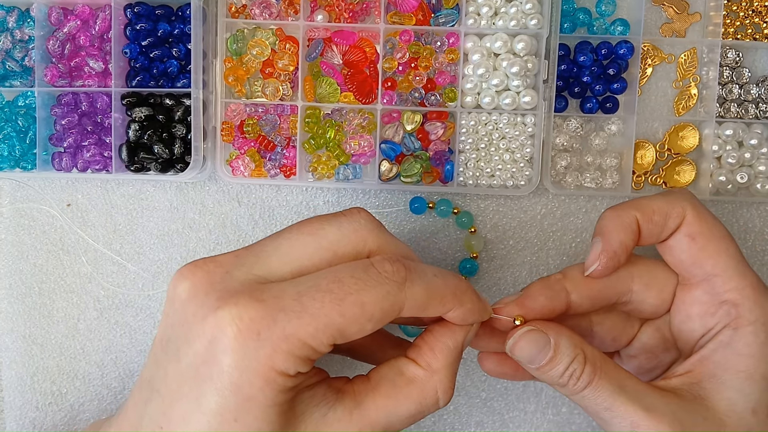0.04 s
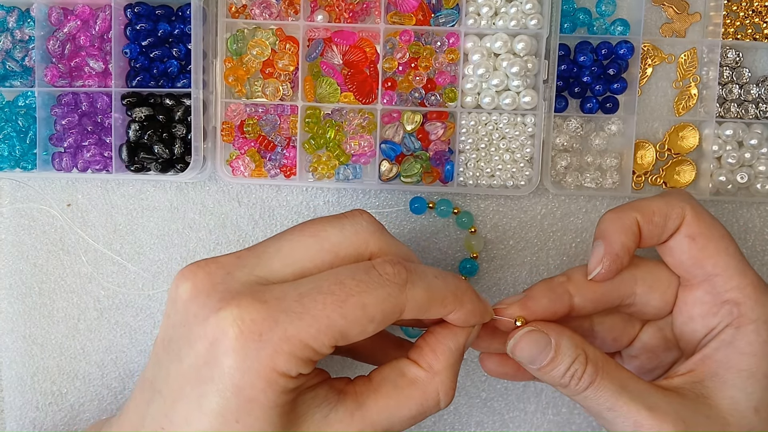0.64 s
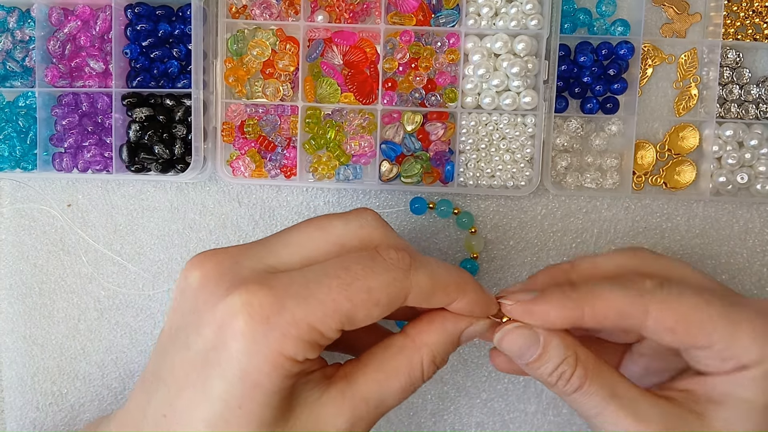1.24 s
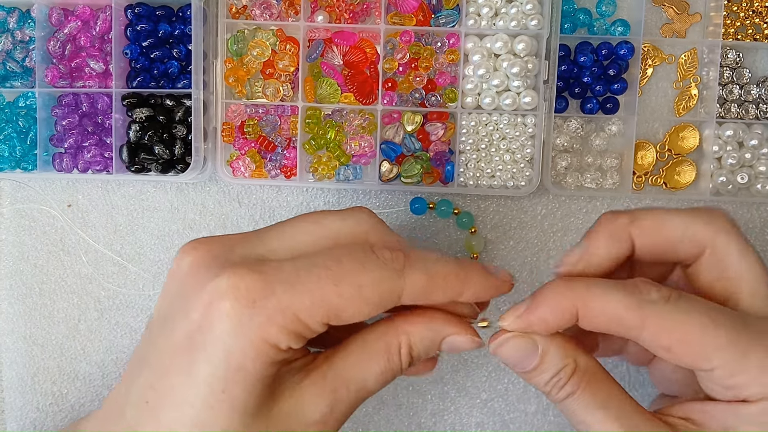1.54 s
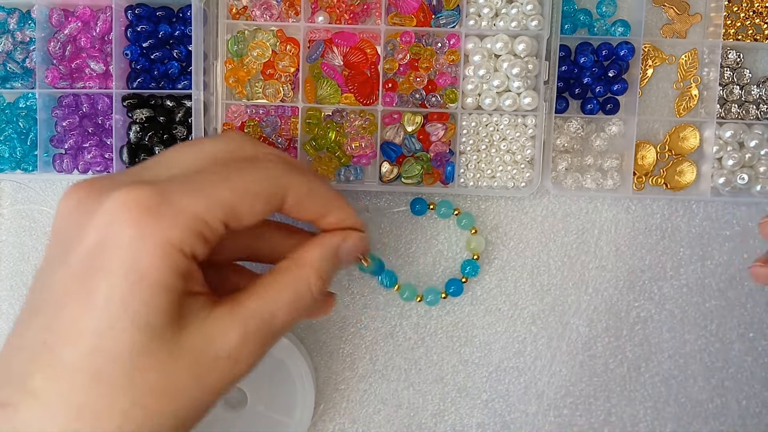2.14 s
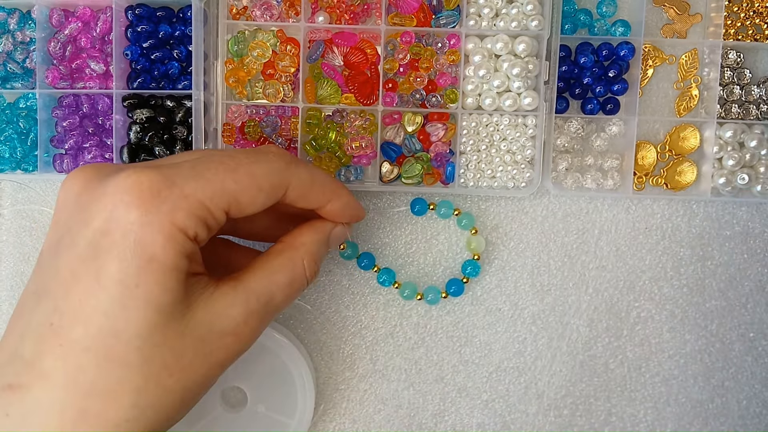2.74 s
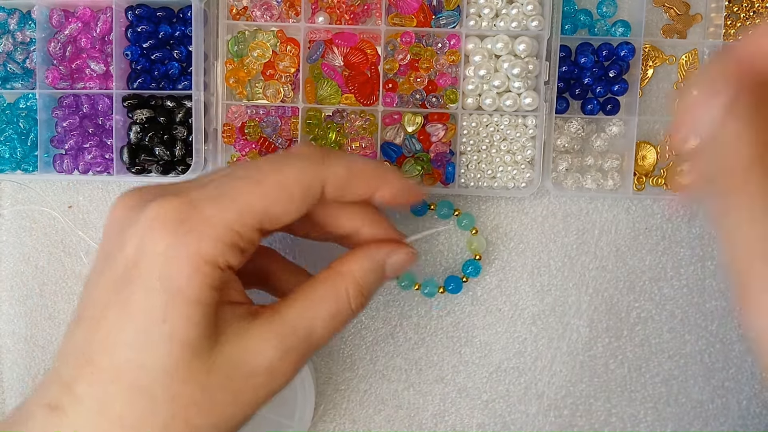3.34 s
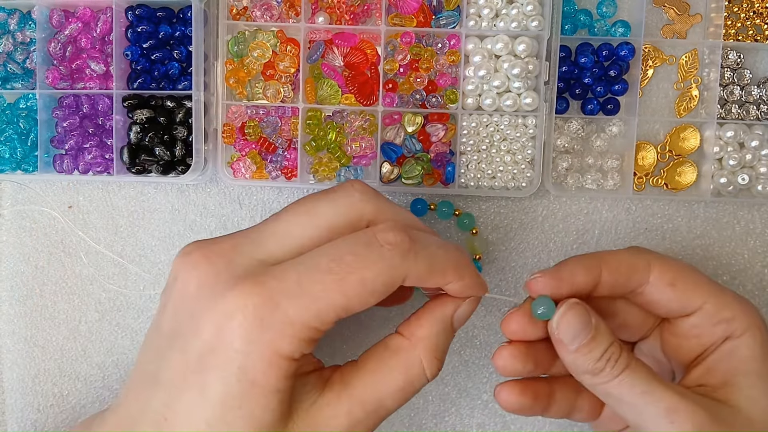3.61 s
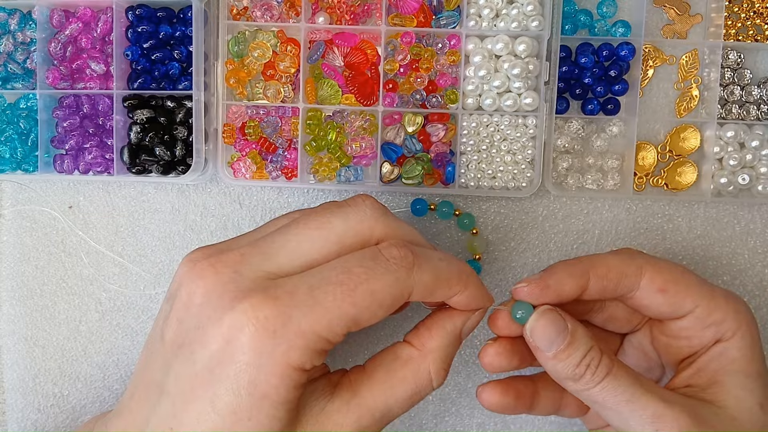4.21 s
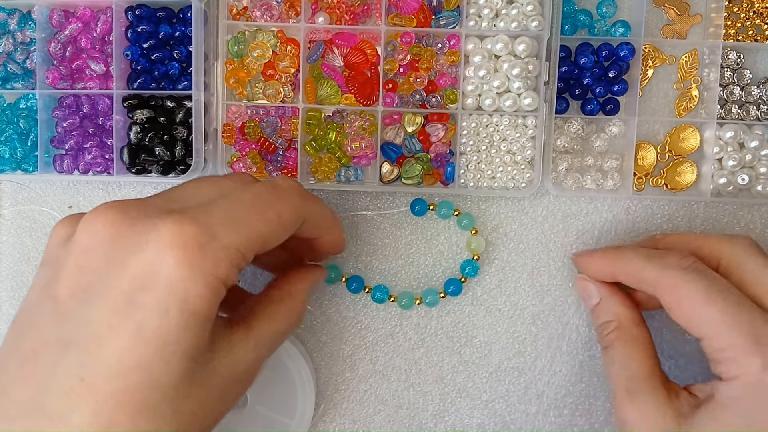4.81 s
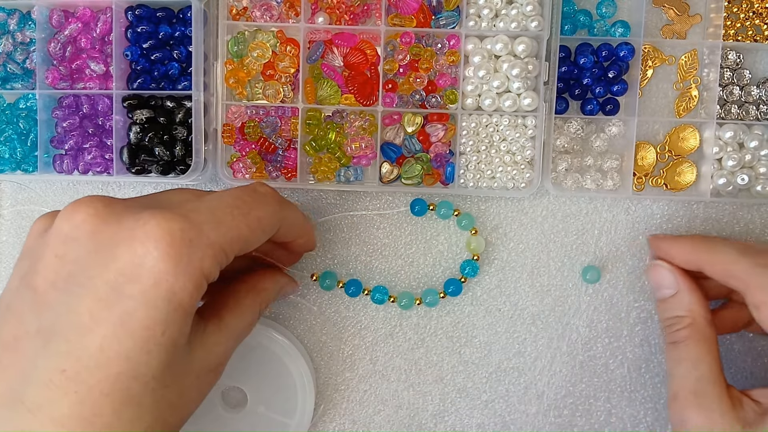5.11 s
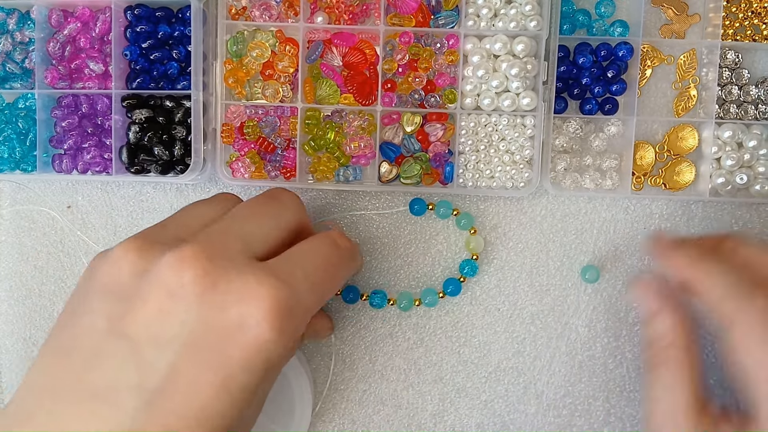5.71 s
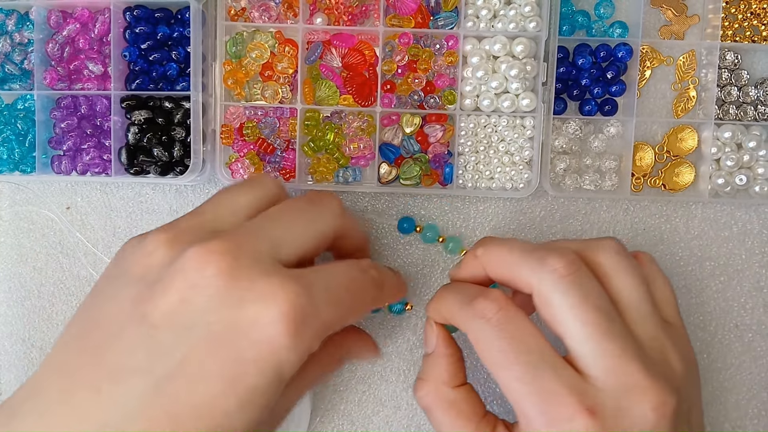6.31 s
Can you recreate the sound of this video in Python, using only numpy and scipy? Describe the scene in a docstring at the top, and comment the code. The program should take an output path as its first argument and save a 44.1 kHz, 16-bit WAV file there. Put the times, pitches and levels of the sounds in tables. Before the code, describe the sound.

In a quiet room, a low engine drone and tyre rush come from outside, swelling and then sinking in pitch as they fade. Nearby, glass beads slide faintly on elastic cord and clatter briefly against the strand with a short ring. Then come small fingernail ticks, grainy brushing on a mat, a couple more bead clicks and dull knocks of hands on the table, all heard close up.

```python
"""A motor vehicle drones through the wall of a quiet room, drops its revs and fades away.
Close by, glass beads are threaded onto elastic cord over a padded table: they rasp along the cord
and click against the strand, each click a sharp snap with a short glassy ring. Fingernails tick,
fingers brush the mat in grainy swells, and hands bump the table, setting its low modes swinging.
The drone is a firing tone with crank overtones, exhaust rumble and tyre rush; a soft hush stays on."""
import sys
import numpy as np
from scipy import signal
from scipy.fft import rfft, irfft, next_fast_len
from scipy.io import wavfile

SR = 44100
rng = np.random.default_rng(int(sys.argv[2]) if len(sys.argv) > 2 else 0)


def generate_wav(signal):
    """Clip the signal to [-1, 1] and save it as 16-bit WAV at the path in sys.argv[1]."""
    frames = np.transpose(np.atleast_2d(signal))
    scaled = np.clip(frames, -1, 1) * 32767
    pcm = np.round(scaled).astype(np.int16)
    wavfile.write(sys.argv[1], SR, pcm)


N = 288855
TIME = np.arange(N) / SR

# Levels are faders, ahead of each layer's trim and filters; pan_db is left minus right.
# how alike diffuse sound is on both sides: frequency_hz, correlation
STEREO_LIKENESS = [(60, 0.5), (130, 0.5), (290, 0.78), (640, 0.4), (1400, -0.02), (15000, 0)]
# how diffuse sound leans to one side: frequency_hz, pan_db
STEREO_BALANCE = [(60, -0.7), (250, -3.5), (1000, -3.5), (3000, -4.5), (12000, -1)]

# engine speed: time_s, firing_hz
REVS = [(0, 102), (.35, 100.3), (.6, 101.3), (.82, 100.4), (1.15, 104), (1.45, 95.83), (2.02, 91.4),
        (2.3, 72.7), (3.4, 72.52), (3.8, 65.4)]
# swell of the firing tone: time_s, level_db
FIRING_LEVEL = [(0, -44.5), (.68, -44), (.72, -64), (.75, -44), (.97, -61.5), (1.02, -38), (1.22, -31),
                (1.255, -42.5), (1.33, -39.5), (1.44, -32.5), (1.53, -35.5), (1.78, -33), (2.01, -38.5),
                (2.05, -49), (2.075, -47), (2.1, -38), (2.16, -33), (2.24, -48), (2.5, -42), (2.6, -50.5),
                (2.87, -47), (2.99, -53.5), (3.16, -46), (3.22, -54.5), (3.47, -49), (3.7, -62.5),
                (4.0, -71)]
# engine load, heard as the weight of the exhaust: time_s, level_db
ENGINE_LOAD = [(0, -51), (.4, -52.5), (.5, -49.5), (1.2, -47.5), (1.6, -50), (2.2, -50), (2.55, -54.5),
               (3.1, -53.5), (3.25, -58.5), (3.55, -57), (3.67, -62), (4.2, -68)]
# engine overtones: crank_multiple, level_db
CRANK_ORDERS = [(2, -5.5), (4.5, -11.5), (5, -18), (6, -7), (7, -8.5), (7.5, -18.5), (8, -21.5)]
# how the wall colours those overtones: frequency_hz, gain_db
WALL_COLOUR = [(45, -11), (66, 0), (95, 7), (132, 4), (150, 4), (175, 0.5), (205, 0.5), (240, -10.5),
               (290, -20.5)]
# exhaust rumble: frequency_hz, level_db
RUMBLE_SPECTRUM = [(15, -34), (28, -4), (40, -15), (62, 8.5), (100, 15), (140, 7), (185, 1), (260, 3.5),
                   (320, -10.5), (500, -52)]
# swell of the tyres: time_s, level_db
TYRE_LEVEL = [(0, -66.5), (.6, -65.5), (.97, -66.5), (1.1, -64), (1.4, -64), (1.68, -61), (1.9, -64),
              (2.4, -67.5), (2.9, -67), (3.7, -75), (4.2, -71)]
# rush of tyres on the road: frequency_hz, level_db
TYRE_SPECTRUM = [(150, -14.5), (300, -1), (600, -0.5), (900, -3.5), (1400, -6.5), (2200, -8.5), (3500, -15),
                 (5500, -24.5), (7500, -58), (16000, -69.5)]
# tyre treble opening as the vehicle nears: time_s, gain_db
TYRE_TREBLE = [(.7, -10), (1.5, -3), (3.3, -0.5)]
# hush of the room: frequency_hz, level_db
HUSH_SPECTRUM = [(20, -10), (65, -3), (95, 1), (130, -9.5), (170, -14.5), (240, -10.5), (350, -23),
                 (800, -23.5), (1150, -26.5), (1500, -23.5), (2200, -29), (3000, -28.5), (5000, -37.5),
                 (7500, -47), (16000, -59)]
# faint high hiss: frequency_hz, level_db
HISS_SPECTRUM = [(3000, -52.5), (7500, -30), (9000, -11.5), (11000, -2.5), (14000, -1.5), (16000, -1)]

# beads sliding on the cord: start_s, duration_s, level_db
SLIDES = [(1.242, 0.088, -63), (1.776, 0.06, -71.5), (1.96, 0.17, -80), (2.168, 0.085, -71.5),
          (3.591, 0.05, -67.5), (3.638, 0.083, -71), (4.275, 0.1, -77)]
# thin rasp of cord in a bead's hole: frequency_hz, level_db
CORD_SPECTRUM = [(1000, -21), (4500, 0), (7300, -8), (8400, 7), (10000, 3), (12000, 4), (15500, -10.5)]
# bead against bead: start_s, level_db, ring_hz, ring_db, brightness_hz, pan_db
CLICKS = [(2.9314, -27, 8550, 11.5, 19000, 1), (2.931, -33, 10150, 12, 15000, -6),
          (2.9327, -33.5, 1830, 16.5, 15000, -5), (3.0400, -45, 9000, 3, 14000, -10),
          (3.0414, -28.5, 5600, 10, 19000, 2.5), (3.0427, -35, 9950, 7, 15000, 1),
          (3.0453, -32, 5440, 12, 13000, -8), (3.0633, -42, 3900, 12, 10000, 2),
          (3.0683, -42, 5700, 8, 10000, -3), (3.0981, -32, 3650, 12, 9000, -4.5),
          (3.107, -32.5, 9950, 8.5, 11500, 0), (3.1247, -39.5, 8800, 3, 11000, 3),
          (3.1819, -31, 3850, 13, 12400, -2.5), (3.1838, -39, 8350, 15, 12000, -4),
          (3.1889, -36.5, 3800, 13, 11000, -3), (3.1984, -38, 3600, 15, 12000, 0),
          (3.2032, -39.5, 2580, 16, 11000, 0), (3.2115, -43, 3500, 8, 10000, -3),
          (3.2503, -47, 4000, 10, 9500, -4), (3.2554, -42.5, 4000, 10.5, 9500, 0),
          (6.0333, -53, 2640, 18, 12000, 4), (6.1238, -43, 2650, 15, 9000, 0)]
# broad resonances of the strand: pitch_hz, width_hz, level_db
STRAND_MODES = [(1320, 520, -6), (1810, 340, -4), (2490, 544, -4.5), (3300, 720, -6.5), (3900, 200, -3),
                (4630, 250, -9), (5630, 380, -2), (6200, 320, -7), (8370, 300, -0.5), (9050, 370, -5),
                (10070, 430, -1.5), (11100, 400, -9), (12400, 400, -2), (13700, 440, 0), (14400, 490, -3.5)]
# glassy after-ring of the loose beads: pitch_hz, width_hz, level_db
GLASS_MODES = [(1870, 77, -14), (2600, 30, -10), (3370, 30, 1), (3590, 23, -6), (3730, 27, -3),
               (3890, 25, -3), (3950, 13, 6), (5740, 28, 1), (6190, 45, -6), (8280, 50, -2)]
# dry ticks of a fingernail or small metal spacer: start_s, level_db, pan_db
TICKS = [(3.611, -69, -4), (3.679, -61.5, -3), (4.8115, -50, -10), (4.814, -52, -3), (4.8285, -57, -4),
         (4.8397, -43, 0), (4.8455, -54, -2), (5.7548, -45, -2), (5.846, -51, -2.5), (6.0332, -36.5, 4),
         (6.0873, -40.5, 1), (6.1237, -31.5, 4), (6.132, -41, 1), (6.2026, -49, -2.5), (6.35, -56, -2),
         (6.4828, -52, 1.5), (6.5057, -37.5, 2)]

# fingers resting lightly on the mat: time_s, level_db
RESTING_DRAG = [(4.79, -110), (4.82, -74.5), (5.45, -74.5), (5.56, -83), (5.62, -72), (6.55, -71)]
# fingers brushing mat and cord: start_s, duration_s, level_db
STROKES = [(4.94, 0.16, -62.5), (5.121, 0.095, -69), (5.208, 0.16, -76.5), (5.613, 0.058, -61.5),
           (5.654, 0.14, -59), (5.802, 0.08, -69), (5.949, 0.063, -60.5), (6.012, 0.032, -55.5),
           (6.028, 0.031, -57), (6.054, 0.045, -63), (6.084, 0.063, -51), (6.136, 0.14, -69.5),
           (6.314, 0.065, -68.5), (6.463, 0.067, -61)]
# colour of that brushing: frequency_hz, level_db
BRUSH_SPECTRUM = [(300, -9), (900, -11.5), (1500, -1), (1950, -7), (2600, -2), (3100, -4), (4500, -1.5),
                  (6000, -6), (7400, -7.5), (8400, 2.5), (10000, -3), (12000, -4), (15500, -3.5)]
# heel of the hand shifting on the table: start_s, duration_s, level_db, brightness_hz
RUBS = [(5.259, 0.235, -66, 2600), (5.598, 0.17, -67, 3000), (6.224, 0.1, -66.5, 710)]
# what the rub stirs in the table top and trays: frequency_hz, level_db
PALM_SPECTRUM = [(150, -5), (450, -1.5), (800, -3.5), (1200, -2), (1520, 1), (1850, -19), (2350, -3.5),
                 (2900, -17), (5000, -25)]
# hands landing on the table: start_s, thud_db, contact_s, knock_db, loss_per_touch_db
BUMPS = [(5.275, -57, 0.0069, -87, 5), (5.394, -70, 0.0015, -49.5, 19), (5.641, -81, 0.0016, -53, 1),
         (5.655, -30, 0.0088, -52, 9), (5.708, -53, 0.002, -48, 14), (6.021, -58, 0.0078, -60, -1),
         (6.087, -53.5, 0.0029, -58.5, 8), (6.117, -48, 0.0054, -61, 4.5),
         (6.4104, -34.5, 0.0025, -36, 4.5), (6.422, -26.5, 0.0046, -38, 14), (6.458, -45, 0.0033, -41, 5),
         (6.498, -43.5, 0.0014, -48.5, 31)]
# low modes of the table top: pitch_hz, level_db, t60_s
TABLE_MODES = [(68, -40, 0.18), (93.7, 4.5, 0.18), (125.4, 2, 0.075), (191, 0.5, 0.053), (234, -0.5, 0.084)]
# stiffer table modes that a knuckle reaches: pitch_hz, level_db, t60_s
KNUCKLE_MODES = [(294, 6.5, 0.034), (368, 2.5, 0.026), (506, -7.5, 0.11), (583, -8.5, 0.076),
                 (761, -11, 0.08)]
# scuff of skin pressing into the mat: frequency_hz, level_db
SCUFF_SPECTRUM = [(100, -0.5), (220, -0.5), (310, -1), (420, -8.5), (560, -6), (700, -7.5), (830, -8.5),
                  (1100, -21), (3000, -30.5), (7000, -55)]


def from_db(db):
    """Decibels to gain."""
    return 10 ** (np.asarray(db) / 20)


def rms_one(x):
    """Scale to rms 1."""
    return x / np.sqrt(np.mean(x ** 2) + 1e-20)


def in_time(curve):
    """An automation curve at every sample."""
    return np.interp(TIME, *np.transpose(curve))


def at_hz(points, hz):
    """Read a spectrum on a log-frequency axis."""
    point_hz, value = np.transpose(points)
    return np.interp(np.log(hz + 1e-6), np.log(point_hz), value)


def panned(db):
    """Left and right gains for a level difference."""
    return from_db(np.array([[db], [-db]]) / 2)


def drift(rate_hz):
    """A random wobble of rms about 1, mostly slower than rate_hz."""
    step = 16
    n = next_fast_len(N // step + 1)
    hz = np.fft.rfftfreq(n, step / SR)
    slow = irfft(rfft(rng.standard_normal(n)) / (1 + (hz / rate_hz) ** 2), n)
    return np.interp(np.arange(N) / step, np.arange(n), rms_one(slow))


def diffuse(spectrum, size=N):
    """Stereo noise of rms 1, narrow in the bass and wide in the treble."""
    n = next_fast_len(size)
    hz = np.fft.rfftfreq(n, 1 / SR)
    mid, side = rfft(rng.standard_normal((2, n)))
    alike = at_hz(STEREO_LIKENESS, hz)
    sides = np.array([[1], [-1]])
    pair = mid + np.sqrt((1 - alike) / (1 + alike)) * side * sides
    colour = from_db(at_hz(spectrum, hz) + sides * at_hz(STEREO_BALANCE, hz) / 2)
    return rms_one(irfft(pair * colour, n)[:, :size])


def resonance(x, hz, width_hz):
    """Two-pole resonance with a peak gain of 1."""
    r = np.exp(-np.pi * width_hz / SR)
    poles = [1, -2 * r * np.cos(2 * np.pi * hz / SR), r * r]
    return signal.lfilter(np.array([1, 0, -1]) * (1 - r * r) / 2, poles, x)


def low_pass(x, hz):
    """Gentle treble cut."""
    return signal.sosfilt(signal.butter(2, hz, fs=SR, output="sos"), x)


def high_pass(x, hz):
    """Gentle bass cut."""
    return signal.sosfilt(signal.butter(1, hz, "high", fs=SR, output="sos"), x)


def decay(t, t60_s):
    """Envelope that falls 60 dB in t60_s."""
    return np.exp(-np.log(1000) * t / t60_s)


def add(out, start_s, sound):
    """Mix a sound in at start_s."""
    i = int(round(start_s * SR))
    out[:, i:i + sound.shape[-1]] += sound[..., :max(N - i, 0)]


def engine(shake=0.16, stumble=0.21, boom_hz=130.6, boom_width_hz=12, full_load_db=-49.5):
    """A firing tone, three pulses a turn, with overtones from uneven cylinders and exhaust rumble."""
    crank_hz = in_time(REVS) / 3
    crank_phase = 2 * np.pi * np.cumsum(crank_hz) / SR
    load_db = in_time(ENGINE_LOAD)
    # rougher at low revs
    uneven = shake + stumble * (1 - crank_hz / crank_hz.max())
    firing_gain = from_db(in_time(FIRING_LEVEL)) * (1 + uneven * drift(24))
    # the room booms when the fourth crank order meets its resonance, more so under load
    detuning = 2 * (4 * crank_hz - boom_hz) / boom_width_hz
    boom_gain = from_db(-51.5 + 5.5 * (load_db - full_load_db)) / np.hypot(1, detuning)
    boom = boom_gain * (1 + shake * drift(14)) * np.sin(4 * crank_phase)
    firing = firing_gain * np.sin(3 * crank_phase + uneven * drift(20))
    overtones = 0
    for order, db in CRANK_ORDERS:
        # each wavers in strength and phase on its way in from the street
        strength = from_db(db + at_hz(WALL_COLOUR, order * crank_hz)) * (1 + 0.38 * drift(7.6))
        phase = order * crank_phase + 0.5 * drift(4.4) + rng.uniform(0, 2 * np.pi)
        overtones += strength * np.sin(phase)
    exhaust = from_db(-2.5) * np.sqrt(2) * overtones + from_db(-0.5) * diffuse(RUMBLE_SPECTRUM)
    return panned(-0.088) * (np.sqrt(2) * (firing + boom) + from_db(load_db) * exhaust)


def tyres(trim_db=4.5, treble_hz=1800, waver_db=1.17, tread_hz=878):
    """A broad road rush that brightens as it nears; the tread whines while it is still far."""
    rush = diffuse(TYRE_SPECTRUM)
    near = from_db(in_time(TYRE_TREBLE))
    dull = signal.sosfiltfilt(signal.butter(2, treble_hz, fs=SR, output="sos"), rush)
    whine = from_db(-3.5 + 5 * drift(3.8)) * resonance(rush, tread_hz, width_hz=100)
    body = dull * from_db(waver_db * drift(8.7))
    treble = near * (rush - dull) * from_db(waver_db * drift(7))
    return from_db(in_time(TYRE_LEVEL) + trim_db) * (body + treble + (1 - near) * whine)


def room_tone(hush_db=-66, hiss_floor_db=-71.5):
    """A steady low hush, and a faint hiss that lifts a little while the vehicle is there."""
    hush = from_db(hush_db) * panned(-3) * diffuse(HUSH_SPECTRUM)
    hiss_gain = np.hypot(from_db(hiss_floor_db), from_db(in_time(TYRE_LEVEL) - 6))
    return hush + hiss_gain * panned(-0.63) * diffuse(HISS_SPECTRUM)


def bead_slides(peak_share=0.3, grain_db=2.5):
    """Cord rasps through a bead's hole as the bead eases into motion and slows to a stop."""
    slip = np.zeros((1, N))
    for start_s, duration_s, db in SLIDES:
        age = np.linspace(0, 1, int(duration_s * SR)) / peak_share
        add(slip, start_s, from_db(db) * (age * np.exp(1 - age)) ** 2)
    rasp = rms_one(diffuse(CORD_SPECTRUM) * from_db(grain_db * drift(200)))
    return panned(-3) * slip * rasp


def snap(t, scatter_db, t60_s):
    """A sharp contact with a dense, dying scatter from whatever lies next to it."""
    out = from_db(scatter_db) * rng.standard_normal((2, len(t))) * decay(t, t60_s)
    out[:, 0] += 1
    return out


def bead_clicks(trim_db=3.5, ring_q=3.9):
    """Glass snaps on glass and rings briefly in the strand; mostly the snap carries into the room."""
    snaps, rings = np.full((2, 2, N), 1e-18)
    t = np.arange(SR // 16) / SR
    for start_s, db, ring_hz, ring_db, brightness_hz, pan_db in CLICKS:
        contact = low_pass(snap(t, scatter_db=-11.5, t60_s=0.023), brightness_hz)
        hit = from_db(db + trim_db) * panned(pan_db) * contact
        add(snaps, start_s, hit)
        # each pair of beads favours a pitch of its own
        add(rings, start_s, hit + (from_db(ring_db) - 1) * resonance(hit, ring_hz, ring_hz / ring_q))
    # small beads radiate mostly treble
    crack = high_pass(snaps, 2500)
    strand = sum(from_db(db) * resonance(rings, hz, width) for hz, width, db in STRAND_MODES)
    glass = sum(from_db(db) * resonance(rings, hz, width) for hz, width, db in GLASS_MODES)
    direct = high_pass(from_db(-4) * crack + strand + from_db(-4.5) * glass, 1100)
    return direct + room(crack + from_db(-6) * strand, wet_db=-14.5, brightness_hz=10000)


def room(x, wet_db, t60_s=0.31, brightness_hz=13000):
    """Dense reflections that build up in a few milliseconds and die quickly."""
    t = np.arange(SR // 2) / SR
    tail = low_pass(rng.standard_normal((2, len(t))), brightness_hz)
    tail *= decay(t, t60_s) * (1 - decay(t, 0.0095))
    tail /= np.sqrt(np.sum(tail ** 2) / 2)
    return from_db(wet_db) * signal.fftconvolve(x, tail, axes=1)[:, :N]


def nail_ticks(trim_db=5.5, thin_hz=6000):
    """Tiny hard contacts, damped by the fingers: all treble and no ring."""
    out = np.full((2, N), 1e-18)
    t = np.arange(SR // 32) / SR
    for start_s, db, pan_db in TICKS:
        add(out, start_s, from_db(db + trim_db) * panned(pan_db) * snap(t, scatter_db=-9, t60_s=0.0082))
    out = high_pass(out, thin_hz)
    return out + room(out, wet_db=-11)


def finger_brush(trim_db=2, rise_db=5.5, grain_db=1.35, catch_db=1.53):
    """Skin and beads drag over mat and cord, catching on the fibres in tiny grains."""
    drag = from_db(in_time(RESTING_DRAG))[None]
    for start_s, duration_s, db in STROKES:
        swell = signal.windows.tukey(int(duration_s * SR), 0.5)
        # a stroke presses harder as it goes
        pressure = from_db(db + rise_db * np.linspace(-1, 0, len(swell)))
        add(drag, start_s, swell * pressure)
    friction = rms_one(diffuse(BRUSH_SPECTRUM) * from_db(grain_db * drift(500) + catch_db * drift(70)))
    return panned(0.44) * (from_db(trim_db) * drag * friction + fibre_snags(drag))


def fibre_snags(drag, trim_db=7, spread_db=4.5, thin_hz=6000, ring_hz=8400):
    """Fibres snag and let go in uneven ticks, more often the harder the fingers drag."""
    snags_per_s = 64 * np.sqrt(drag / from_db(-56))
    snagged = rng.random(N) < snags_per_s / SR
    sizes = from_db(spread_db * np.minimum(rng.exponential(1, N), 3)) * rng.choice([-1, 1], N)
    tick = snap(np.arange(SR // 100) / SR, scatter_db=-13, t60_s=0.0045)
    crackle = high_pass(signal.fftconvolve(snagged * sizes * drag, tick, axes=1)[:, :N], thin_hz)
    return from_db(trim_db) * (crackle + from_db(2) * resonance(crackle, ring_hz, width_hz=600))


def palm_rubs():
    """The heel of the hand shifts on the table in short, dull swells of friction."""
    out = np.zeros((2, N))
    for start_s, duration_s, db, brightness_hz in RUBS:
        swell = signal.windows.tukey(int(duration_s * SR), 0.24)
        rub = low_pass(diffuse(PALM_SPECTRUM, size=len(swell)), brightness_hz)
        add(out, start_s, from_db(db) * swell * rms_one(rub))
    return panned(-0.46) * out


def ringing(modes, t):
    """Damped sines set off together; neighbouring modes swing in opposite directions."""
    return sum((-1) ** k * from_db(db) * np.sin(2 * np.pi * hz * t) * decay(t, t60_s)
               for k, (hz, db, t60_s) in enumerate(modes))


def pushed(ring, t, contact_s):
    """Drive a ring with a half-sine push of unit area: the longer the contact, the duller the hit."""
    push = np.sin(np.pi * np.minimum(t / contact_s, 1))
    return signal.fftconvolve(push / push.sum(), ring)[:len(t)]


def table_bumps(knuckle_share=0.34, touches=3, gap_s=0.013, jitter_s=0.001):
    """A knuckle knocks, then the hand settles in quick touches that swing the top and scuff the mat."""
    out = np.zeros((2, N))
    t = np.arange(SR // 3) / SR
    swing = ringing(TABLE_MODES, t)
    knock = from_db(-1) * ringing(KNUCKLE_MODES, t) * (1 - decay(t, 0.0075))
    scuff_shape = from_db(-6) * decay(t, 0.2) * (1 - decay(t, 0.018))
    for start_s, thud_db, contact_s, knock_db, loss_db in BUMPS:
        add(out, start_s, from_db(knock_db) * pushed(knock, t, knuckle_share * contact_s))
        thud = from_db(thud_db) * pushed(swing, t, contact_s)
        for touch in range(touches):
            scuff = from_db(knock_db) * scuff_shape * diffuse(SCUFF_SPECTRUM, size=len(t))
            add(out, start_s, from_db(-touch * loss_db) * (thud + scuff))
            start_s += gap_s + jitter_s * rng.uniform(-1.1, 1)
    out *= panned(-0.64)
    return out + room(out, wet_db=-20.5)


def scene():
    """The fading vehicle and the room tone lie behind the close sounds of beads and hands."""
    fade_out = np.interp(TIME, [3.53, 4.05], [1, 0])
    background = fade_out * (engine() + tyres()) + room_tone()
    beads = bead_slides() + bead_clicks()
    hands = nail_ticks() + finger_brush() + palm_rubs() + table_bumps()
    return background + beads + hands


def record(dry):
    """A steep cut takes off the very top."""
    return signal.sosfilt(signal.ellip(10, .2, 70, 15750, fs=SR, output="sos"), dry)


dry = scene()
out = record(dry)
generate_wav(out)
```